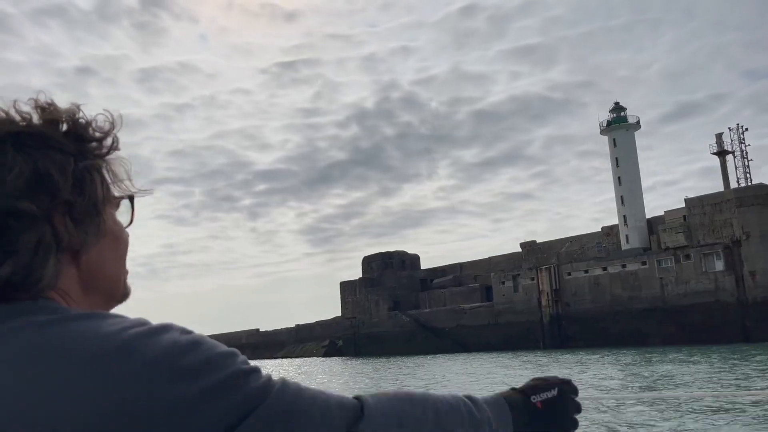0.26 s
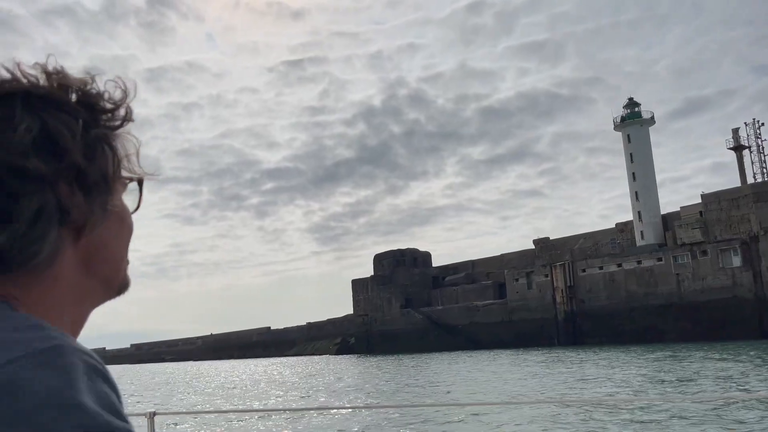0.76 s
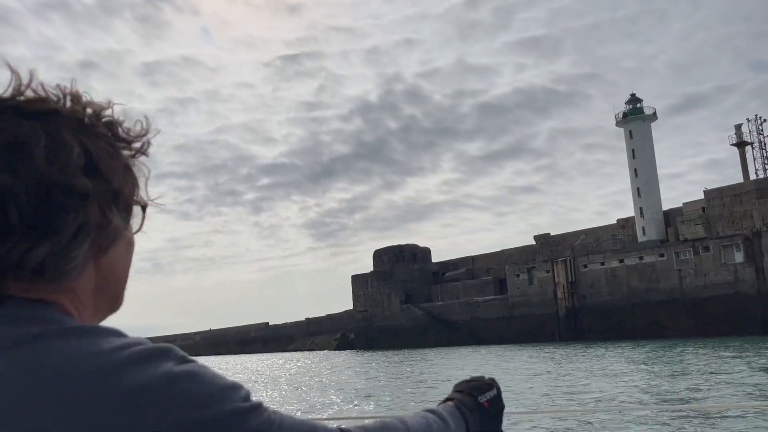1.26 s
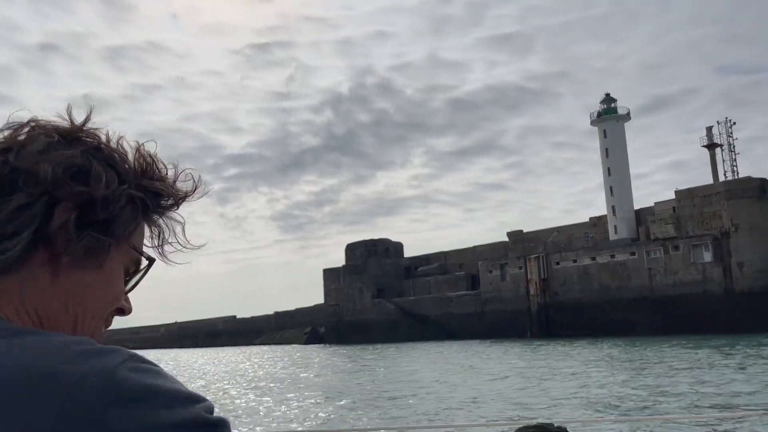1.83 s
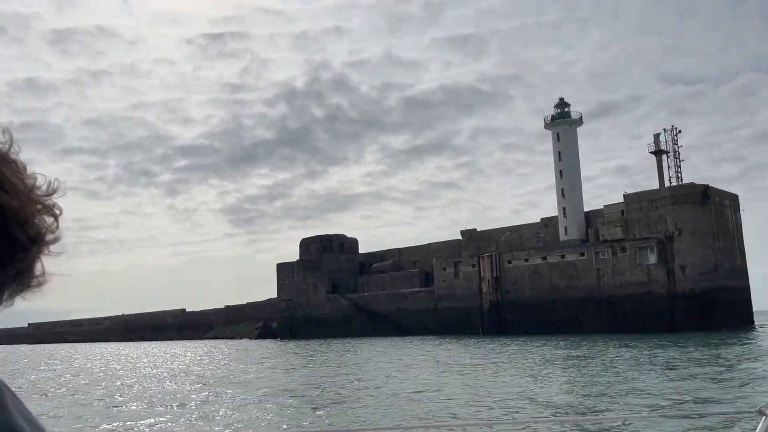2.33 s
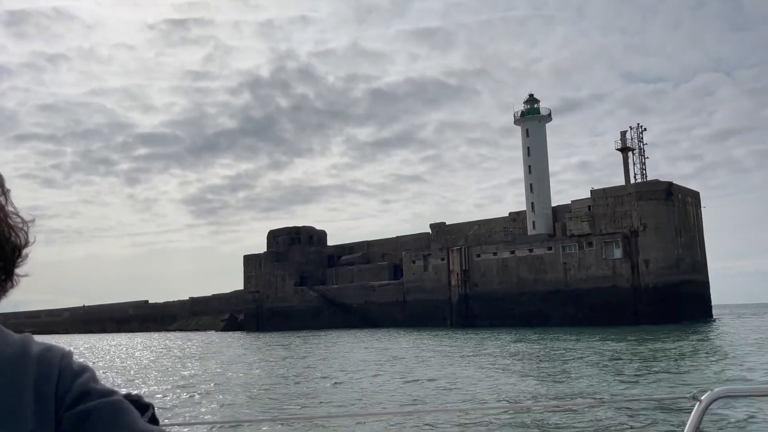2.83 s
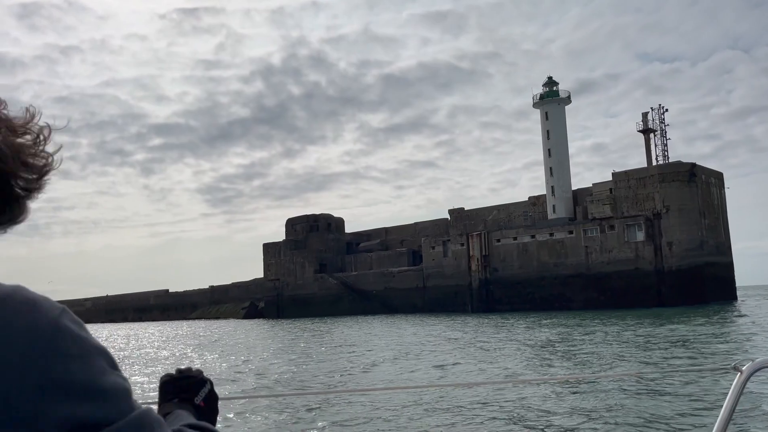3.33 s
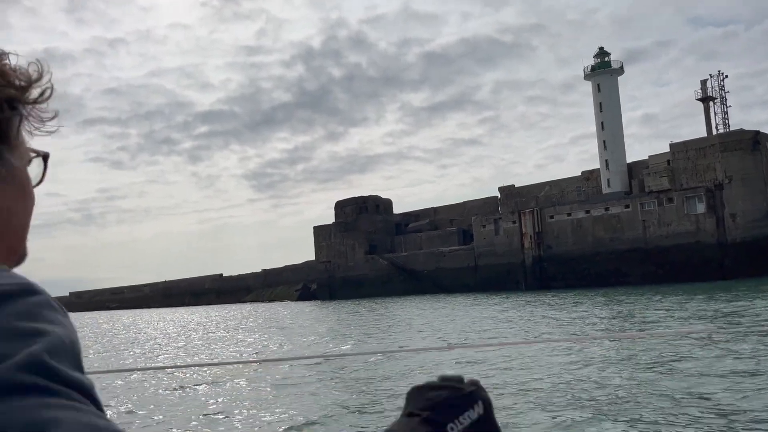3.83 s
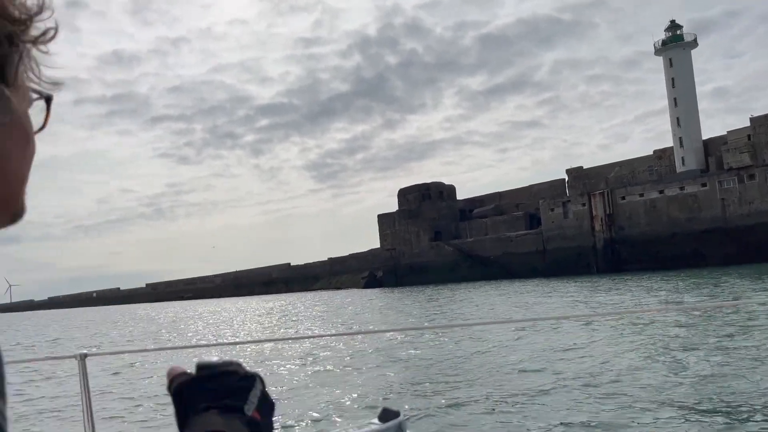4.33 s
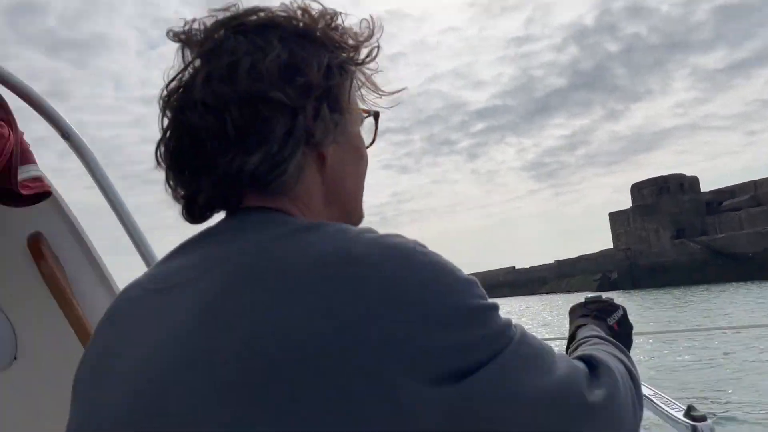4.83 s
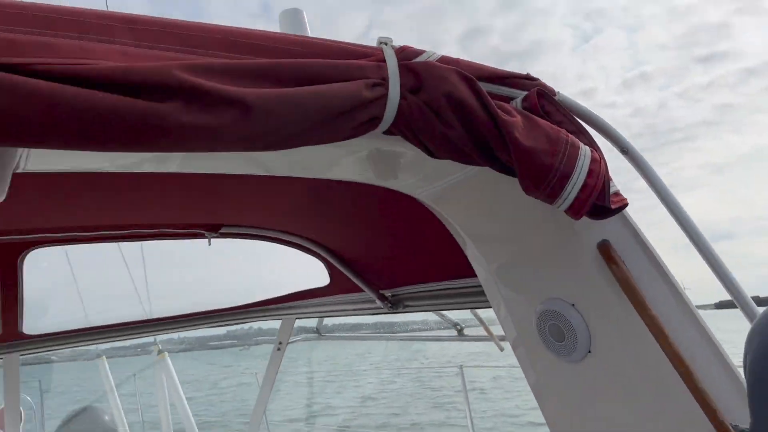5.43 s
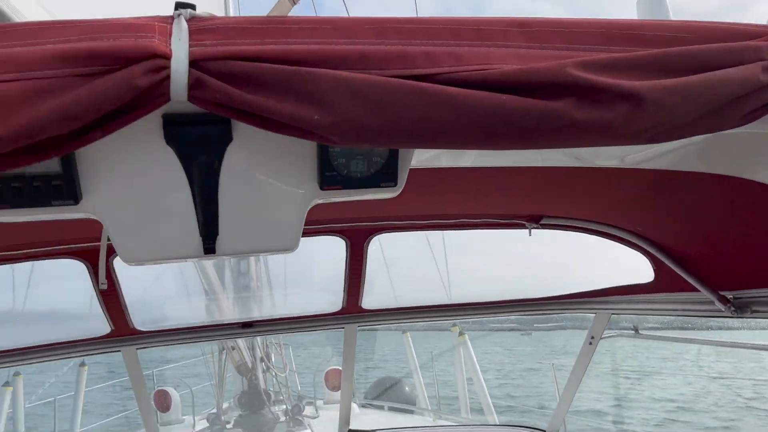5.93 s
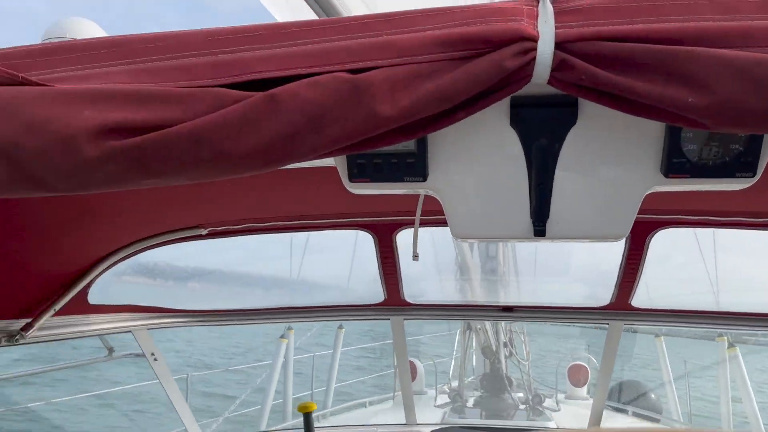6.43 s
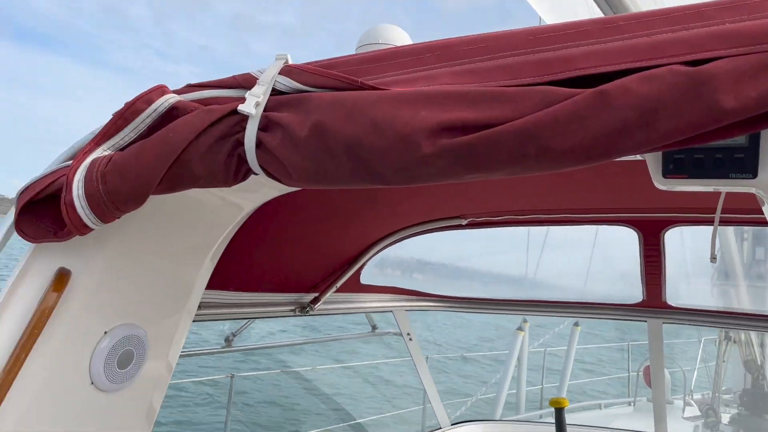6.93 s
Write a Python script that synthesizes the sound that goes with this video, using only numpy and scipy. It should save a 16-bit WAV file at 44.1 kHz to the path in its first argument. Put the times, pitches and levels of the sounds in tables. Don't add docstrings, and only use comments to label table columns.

```python
import sys
import numpy as np
from scipy import signal
from scipy.fft import rfft, irfft
from scipy.io import wavfile
from scipy.ndimage import uniform_filter1d

SR = 44100
rng = np.random.default_rng(int(sys.argv[2]) if len(sys.argv) > 2 else 0)


def voltage_ratio(decibels):
    exponent = np.asarray(decibels, float) / 20
    return 10 ** exponent


def digitize_waveform(pressure):
    field = np.atleast_2d(pressure).T
    bounded = np.clip(field, -1, 1)
    quanta = np.round(bounded * 32767).astype(np.int16)
    wavfile.write(sys.argv[1], SR, quanta)


N = 316682
LEFT_RIGHT = np.array([[1], [-1]])


def curve(table):
    s, *columns = np.transpose(table)
    return [np.interp(np.arange(N) / SR, s, c) for c in columns]


def unit(x):
    return x / np.sqrt(np.mean(x ** 2))


def band(x, hz, octaves):
    half = 2 ** (octaves / 2)
    sos = signal.butter(2, [hz / half, hz * half], "band", fs=SR, output="sos")
    return signal.sosfilt(sos, x)


def colour(x, points):
    hz, db = np.transpose(points)
    f = np.arange(N // 2 + 1) * SR / N + 1
    return irfft(rfft(x) * voltage_ratio(np.interp(np.log(f), np.log(hz), db)), N)


def walk(rate):
    k = int(SR / rate)
    held = np.repeat(rng.standard_normal(N // k + 1), k)
    return unit(uniform_filter1d(uniform_filter1d(held, k), k)[:N])


def blows(s, size, rise_s, fall_s):
    train = np.zeros(N)
    np.add.at(train, np.minimum((s * SR).astype(int), N - 1), size)
    slow = np.exp(-1 / (fall_s * SR))
    quick = slow * np.exp(-1 / (rise_s * SR))
    steps = np.arange(SR // 20)
    peak = np.max(slow ** steps - quick ** steps)
    return signal.lfilter([0, (slow - quick) / peak], np.convolve([1, -slow], [1, -quick]), train)


def bumps(table, length_s, rise_s, cycles, sag=0., sag_s=0.0037):
    out = np.zeros(N + SR)
    t = np.arange(int(length_s * SR)) / SR
    bent = t + sag * sag_s * (1 - np.exp(-t / sag_s))
    for s, db, hz in table:
        start = int(s * SR)
        envelope = np.exp(-t * hz / cycles) * (1 - np.exp(-t / rise_s))
        out[start:start + len(t)] += voltage_ratio(db) * np.sin(2 * np.pi * hz * bent) * envelope
    return out[:N]


def ring(x, hz, t60):
    p = np.exp(2j * np.pi * hz / SR - np.log(1000) / (t60 * SR))
    return signal.lfilter([1], [1, -p], x)


def sides(db):
    return voltage_ratio(LEFT_RIGHT * db / 2)


def surf():
    # f/Hz, density/dB per Hz
    hiss = [(1200, -29), (2000, -4.5), (4500, -12), (6600, -8), (9100, -13.5), (10500, -24), (11500, -61)]
    return voltage_ratio(-64) * unit(colour(rng.standard_normal((2, N)), hiss))


def whirr():
    # t/s, level/dB
    whirr_level = [(0, -47), (2.3, -46), (2.85, -66), (3.1, -54), (3.4, -56), (3.6, -42.5), (5.1, -45.5),
                   (7.18, -49)]
    # f/Hz, density/dB per Hz
    spectrum = [(530, -11), (900, 2), (1110, -6), (1150, -3.5), (1900, -11.5), (6560, -30), (9150, -30.5),
                (14000, -49)]
    mid, side = (unit(colour(rng.standard_normal(N), spectrum)) for _ in range(2))
    level_db = curve(whirr_level)[0] - 3 + 2.0 * walk(12)
    return voltage_ratio(level_db) * (mid + 1.02 * side * LEFT_RIGHT)


def eddies(rate, spread_db):
    present, sign, size = rng.random((3, N))
    kick = np.sign(sign - .5) * voltage_ratio(-spread_db * np.log(size + 0.06))
    return unit((present < rate / SR) * kick)


def gusts():
    # t/s, level/dB
    breeze = [(0, -36), (.6, -34), (1.0, -34.5), (1.25, -38), (1.5, -35.5), (2.3, -23), (2.46, -36.5),
              (2.9, -26), (3.17, -44), (3.4, -30.5), (3.9, -32), (4.2, -43.5), (4.4, -28.5), (4.7, -42),
              (5.6, -40.5), (6.1, -32.5), (6.38, -31.5), (7.18, -30.5)]
    # peak t/s, half length/s, level/dB, harshness/dB
    gust = [(0.046, 0.027, -20, -3), (0.275, 0.056, -31, 5), (1, 0.036, -27.5, -26),
            (1.177, 0.022, -21.5, -1), (1.417, 0.065, -25.5, 3), (1.491, 0.015, -19.5, 8.5),
            (1.626, 0.037, -26, 8), (1.74, 0.037, -11.5, -5.5), (1.853, 0.017, -18.5, 1),
            (2.14, 0.095, -30, 9.5), (2.293, .06, -19, 5), (2.523, 0.024, -15.5, 2), (2.599, .05, -25, 10),
            (2.717, 0.039, -26, 5), (2.828, 0.045, -25.5, 10.5), (2.968, 0.056, -27.5, 0),
            (3.27, 0.05, -17.5, 5), (3.473, 0.022, -30, -24), (3.574, 0.018, -36, -2),
            (3.726, 0.041, -34, 13), (3.873, 0.034, -22.5, 5.5), (3.938, 0.035, -23, 6.5),
            (4.311, 0.044, -32, 5), (4.588, 0.039, -23, 8.5), (5.253, 0.018, -20.5, -7.5),
            (5.424, 0.11, -29, -1.5), (5.785, 0.047, -35, 5), (6.023, 0.032, -20, -9.5),
            (6.493, 0.082, -31.5, 7), (7.063, 0.057, -43, 18.5)]
    # breeze offset/dB, gust offset/dB, share of harshness
    follow = [
        (0.1, -2.44, -0.17),
        (-4, -5, 0.4),
        (-11.5, -13, 1.34),
    ]
    t = np.arange(0, N + 64, 64) / SR
    s, half, db, harsh_db = np.transpose(gust)[:, :, None]
    width = half * np.where(t < s, 0.8, 1)
    shape = np.exp(-np.abs((t - s) / width) ** 2.2)
    swells = []
    for breeze_db, gust_db, share in follow:
        swell = np.sum(voltage_ratio(db + gust_db + share * harsh_db) * shape, axis=0)
        steady = voltage_ratio(curve(breeze)[0] + breeze_db)
        swells.append(np.interp(np.arange(N) / SR, t, swell) + steady)
    return swells


def pops():
    # t/s, peak/dB, f/Hz
    puffs = [(0.046, -9, 271), (0.603, -13.5, 290), (0.765, -10, 296), (1.162, -13.5, 300),
             (1.438, -4.5, 302), (1.61, -18, 241), (1.706, -13.5, 149), (1.832, -15, 208),
             (1.932, -17, 303), (2.169, -16, 140), (2.487, -16.5, 256), (2.698, -9.5, 493),
             (2.738, -38, 182), (2.833, -4.5, 210), (3.218, -4.5, 737), (3.452, -15, 290),
             (3.825, -13.5, 194), (4.289, -10.5, 482), (2.94, -10.5, 390), (3.95, -21, 405),
             (5.223, -20.5, 308), (5.398, -14, 434), (6.283, -10, 434), (6.537, -29, 197),
             (2.286, -0.5, 150), (2.511, -23.5, 144), (2.867, -17, 690), (3.71, -11, 613),
             (4.589, -13.5, 147), (6.735, -20.5, 147)]
    s, db, hz = np.transpose(puffs)
    rise_s = .002
    rasping = unit(band(rng.standard_normal((2, N)), 644, 0.95))
    edge = blows(s, voltage_ratio(db - 19), rise_s, 0.0059) * rasping
    return voltage_ratio(0.5) * bumps(puffs, 0.103, rise_s, cycles=1.82, sag=0.43) + edge


def wind():
    # f/Hz, level/dB, left-right likeness (0-1)
    rumble = [(37.4, -9.5, 1), (64.3, -2.5, 0.97), (95.5, -2, 1), (135.2, -4, 0.79)]
    flutter = [(195.8, -1.8, 0.88), (291.5, 0.81, 0.69), (363.4, -1.3, 0.77)]
    rasp = [(608, 2, 0.41), (735.4, -3, 0.21), (1202, -9.5, 0.07), (1490, -16.5, 0.12)]
    # t/s, left minus right/dB
    lean = [(0, 0), (2.5, 0.5), (5.6, 1.2), (6.2, 3.5), (7.18, 4.5)]
    out = 0
    kicks = [eddies(rate=300, spread_db=5.5) for _ in range(2)]
    for gain, bands, share in zip(gusts(), (rumble, flutter, rasp), (.4, 1.8, 2.4)):
        layer = 0
        for hz, band_db, like in bands:
            like = np.clip(like, 0, 1)
            pushes = [rng.standard_normal(N) + share * kick for kick in kicks]
            mid, side = (unit(band(band(push, hz, 0.73), hz, 0.73)) for push in pushes)
            pair = np.sqrt(1 + like) * mid + np.sqrt(1 - like) * side * LEFT_RIGHT
            layer = layer + voltage_ratio(band_db + 1.5 * walk(14)) * pair
        out = out + gain * unit(voltage_ratio(2.05 * share * walk(60)) * layer)
    return (out + pops()) * sides(curve(lean)[0])


def teeth():
    # t/s, teeth passed
    pulls = [
        [(0.0081, 0), (0.1098, 3), (0.2961, 8), (0.5568, 17), (0.687, 22), (0.714, 23), (0.7532, 24)],
        [(0.8081, 0), (0.9626, 4), (1.1452, 8), (1.2152, 9), (1.4521, 15), (1.4763, 16), (1.5029, 17),
         (1.6622, 24), (1.6847, 25)],
        [(1.7227, 0), (1.7528, 1), (2.2141, 21), (2.3084, 25), (2.406, 28), (2.7297, 37), (2.7714, 38),
         (2.8298, 39)],
        [(3.4732, 0), (3.7665, 9), (3.8022, 10), (3.9664, 16), (4.1659, 25), (4.1932, 26), (4.3612, 32),
         (4.4326, 34)],
        [(4.4692, 0), (4.501, 1), (4.9243, 17), (5.0095, 20), (5.1459, 24), (5.3588, 31), (5.4262, 34),
         (5.6213, 43), (5.7749, 48)],
        [(5.805, 0), (5.907, 3), (6.2058, 13), (6.544, 25), (6.7384, 31), (6.8983, 37), (7.141, 46)],
    ]
    out = []
    for pull in pulls:
        s, n = np.transpose(pull)
        pace = np.gradient(s, n)
        m = np.arange(n[-1] + 1)
        i = np.minimum(np.searchsorted(n, m, "right") - 1, len(n) - 2)
        h, ds = np.diff(n)[i], np.diff(s)[i]
        u, a, b = (m - n[i]) / h, h * pace[i], h * pace[i + 1]
        out.append(s[i] + u * a + u ** 2 * (3 * ds - 2 * a - b) + u ** 3 * (a + b - 2 * ds))
    return np.concatenate(out)


def drum(s, db, modes, scatter_db, contact_s):
    out = 0
    for hz, mode_db, t60, pan_db, lead in modes:
        size = voltage_ratio(db + mode_db + scatter_db * rng.standard_normal(len(s)))
        chatter = blows(s, size, 0.00081, contact_s) * rng.standard_normal(N)
        gains = sides(pan_db) * np.exp(.5j * lead * LEFT_RIGHT)
        out = out + (gains * ring(chatter, hz, t60)).imag
    return out * voltage_ratio(-17.5)


def crack(s, db, rise_s, fall_s):
    # f/Hz, density/dB per Hz
    spectrum = [(700, 3), (1500, -1), (2700, -1), (4500, -2), (6500, -5), (8500, -9.5), (10500, -16),
                (12800, -26), (14300, -5), (15600, 1), (16500, 3.5)]
    mid, side = (unit(colour(rng.standard_normal(N), spectrum)) for _ in range(2))
    noise = mid + 0.55 * side * LEFT_RIGHT
    dull = band(noise, 2240, 3.6)
    bright = noise - dull
    lean_db = 3.1 * rng.standard_normal(len(s))
    dull_blows = blows(s, voltage_ratio(db + lean_db), rise_s, fall_s)
    bright_blows = blows(s, voltage_ratio(db - lean_db), rise_s, fall_s)
    return dull_blows * dull + bright_blows * bright


def pawls():
    # t/s, peak/dB
    drop = [(0, -24.5), (.35, -23.5), (.62, -21.5), (.85, -26.5), (1.1, -24), (2.0, -24), (2.35, -27.5),
            (2.8, -25.5), (3.5, -25), (4.1, -24), (4.45, -22.5), (4.75, -21.5), (5.17, -29), (5.35, -19.5),
            (5.7, -38.5), (6.3, -41), (6.65, -46), (7.18, -49.5)]
    # t/s, diffuse share/dB, low drum share/dB, direct crack share/dB
    turn = [
        (0, -21.5, -11.5, -10),
        (5.0, -22.5, -13, -10.5),
        (5.4, -19, -18, -42),
        (5.8, -5.5, -3, -23),
        (7.18, 8, 5, -17),
    ]
    # f/Hz, level/dB, t60/s, left minus right/dB, left lead/rad
    high_modes = [(7742, -7, 0.041, -3, 1.34), (7805, -8, 0.027, 0.5, 1.18), (8773, -8, 0.017, -0.5, -0.42),
                  (9290, -15, 0.014, -0.5, -0.016), (14300, 0, 0.012, -1, 2.3),
                  (14620, -5, 0.0093, -1, 1.3), (15270, -3.5, 0.02, 1, 1), (15700, -9, 0.012, 9, .4)]
    low_modes = [(3631, -6, 0.053, 2.5, 1), (3500, -10.5, 0.021, 0, 1), (3980, -6, 0.017, 9, 0.77),
                 (4660, -24, 0.012, 13, 0.28), (2530, -3.5, 0.0055, -2.5, 0.32),
                 (1540, -10, 0.031, -13, 0.33)]
    s = teeth()
    db = np.interp(s, *np.transpose(drop)) + 2.5 * rng.standard_normal(len(s))
    at, *shares = np.transpose(turn)
    wet_db, low_db, dry_db = (db + np.interp(s, at, share) for share in shares)
    snap_chance, time_chance, second_chance = rng.standard_normal((3, len(s)))
    rings = drum(s, db, high_modes, scatter_db=5.5, contact_s=0.0037)
    rings = rings + drum(s, low_db, low_modes, scatter_db=4.0, contact_s=0.0047)
    snap = crack(s, dry_db + 2.5 * snap_chance, rise_s=0.0018, fall_s=0.0058)
    second_s = np.maximum(s - .011 + 0.0038 * time_chance, 0)
    second = crack(second_s, dry_db - 3 + 4.1 * second_chance, rise_s=0.00036, fall_s=0.0011)
    smear = crack(s, wet_db - 8.5, rise_s=0.027, fall_s=0.023)
    smear = smear + drum(s, wet_db - 6.0, high_modes, scatter_db=-10.5, contact_s=0.032)
    return rings + snap + second + smear


def gear():
    # t/s, peak/dB
    strength = [(0, -37), (.6, -31), (1.05, -27.5), (1.5, -34.5), (2.8, -58), (2.84, -85), (3.46, -90),
                (3.5, -39), (5, -38), (5.5, -55), (7.18, -41)]
    drops = teeth()
    angle = np.arange(.19, len(drops) - 1, .893)
    s = np.interp(angle, np.arange(len(drops)), drops)
    db = np.interp(s, *np.transpose(strength)) + 4.5 * rng.standard_normal(len(s))
    tick = crack(s, db, rise_s=0.00033, fall_s=0.0014)
    return band(tick, 4200, 1.68) + voltage_ratio(-16) * tick


def knocks():
    # t/s, peak/dB, f/Hz
    hits = [(0.2134, -18, 4140), (0.3247, -16.5, 4140), (0.3626, -26, 3560), (0.4837, -14, 2830),
            (0.5945, -12, 3640), (0.7153, -36, 3500), (0.7552, -15.5, 3680), (0.99, -21.5, 3560),
            (1.0907, -19, 3820), (1.157, -11.5, 4760), (1.2785, -34, 3560), (1.4775, -13.5, 3720),
            (1.7407, -12, 2860), (1.923, -14.5, 3400), (2.142, -22.5, 2960), (2.2395, -21, 3700),
            (2.6028, -22.5, 2600), (3.0195, -17.5, 1136), (3.396, -25.5, 1450), (3.43, -26, 2400),
            (3.496, -19, 2700), (3.8722, -14, 2590), (4.0215, -16.5, 2420), (4.169, -17.5, 4330),
            (4.2257, -17, 2400), (4.435, -22.5, 3500), (4.6182, -13.5, 2570), (4.7856, -12, 2610),
            (5.0085, -12.5, 5060), (5.358, -25, 3600),
            (5.7762, -25, 3500), (5.9677, -28, 3300), (6.0838, -22, 2480), (6.306, -23, 2580),
            (6.5479, -24, 3660), (6.788, -26, 4200), (6.9962, -21.5, 3630), (7.1061, -23.5, 3700)]
    table = np.array(hits)
    s, db, hz = table.T
    crack_db = db - 9.5 + 9 * np.log2(np.minimum(hz / 2400, 1))
    dead = hz < 2000
    rings = bumps(table[~dead], .05, rise_s=.0003, cycles=5.6)
    rings = rings + bumps(table[dead], .05, rise_s=0.00065, cycles=4.0)
    return voltage_ratio(-4) * rings + crack(s, crack_db, rise_s=.0003, fall_s=0.0069)


def scene():
    # delay/s, left/dB, right/dB
    echoes = [(.0023, -38, -25)]
    winch = pawls() + gear() + knocks()
    heard = winch.copy()
    for delay, left_db, right_db in echoes:
        lag = int(delay * SR)
        heard[:, lag:] += voltage_ratio(np.array([[left_db], [right_db]])) * winch.mean(axis=0)[:-lag]
    return heard + wind() + whirr() + surf()


def roll_off(x):
    return signal.sosfilt(signal.butter(12, 16990, fs=SR, output="sos"), x)


def record(dry):
    # f/Hz, gain/dB
    gains = [(5200, 1), (6600, -8), (7500, -6), (10500, -0.5), (12700, -6), (14000, -16), (15750, -14.5),
             (15950, -31), (17000, -52)]
    x = signal.sosfilt(signal.butter(3, 36, "high", fs=SR, output="sos"), dry)
    x = colour(np.tanh(x), gains)
    return roll_off(x)


dry = scene()
out = record(dry)
digitize_waveform(out)
```